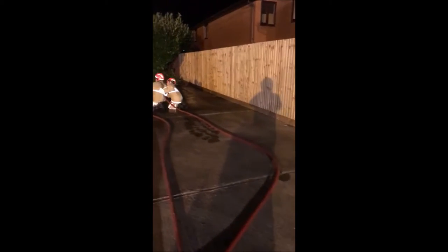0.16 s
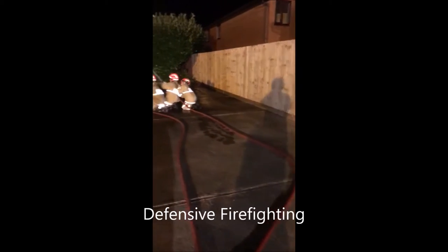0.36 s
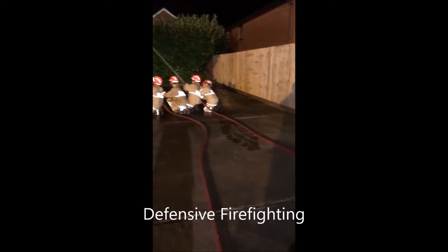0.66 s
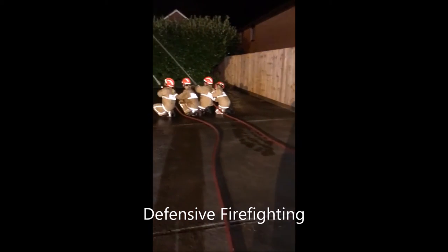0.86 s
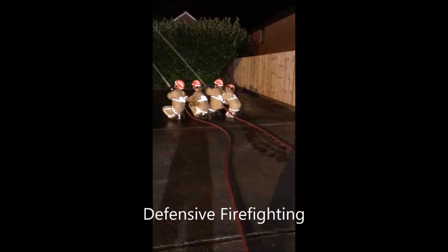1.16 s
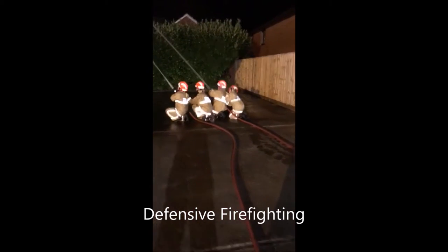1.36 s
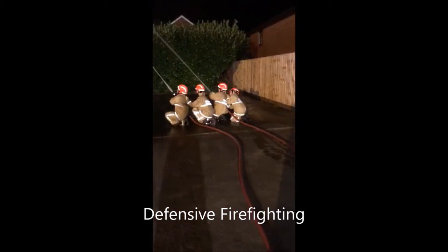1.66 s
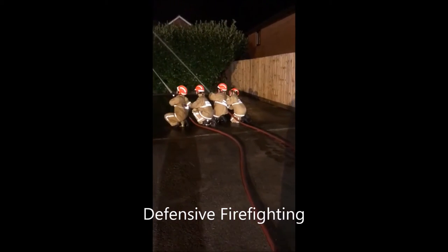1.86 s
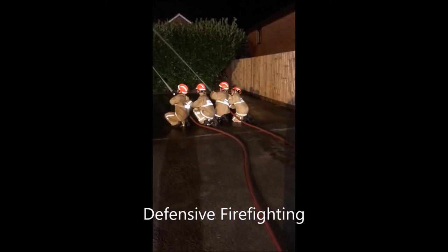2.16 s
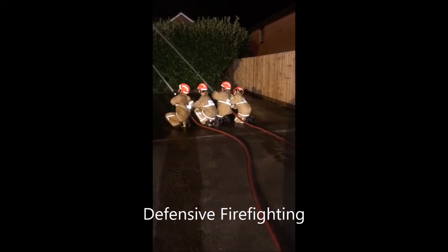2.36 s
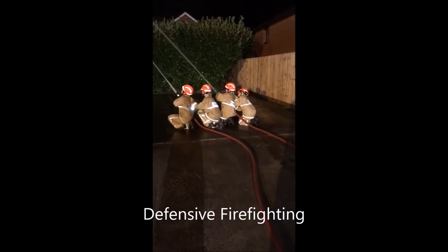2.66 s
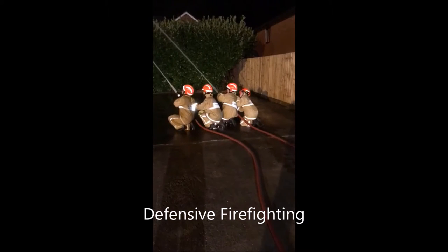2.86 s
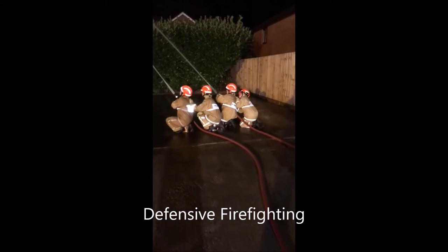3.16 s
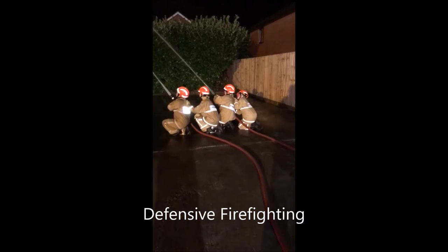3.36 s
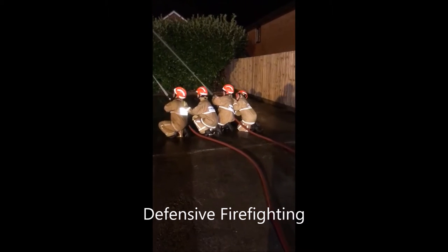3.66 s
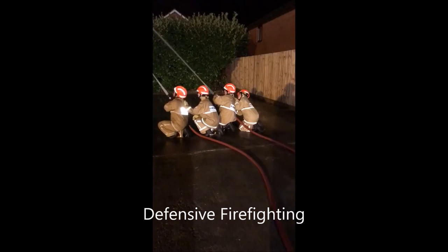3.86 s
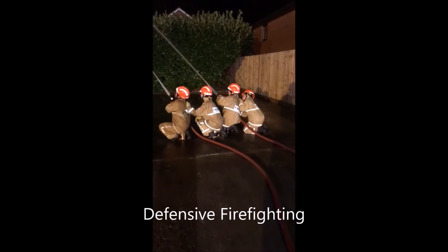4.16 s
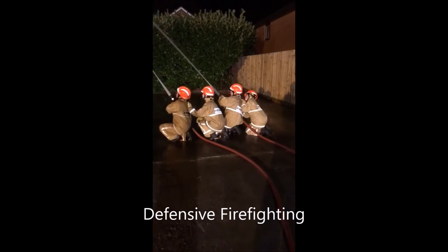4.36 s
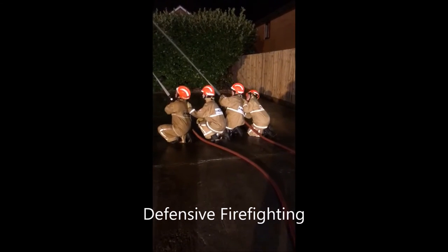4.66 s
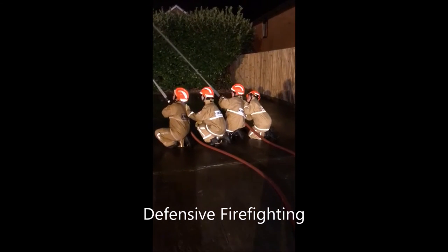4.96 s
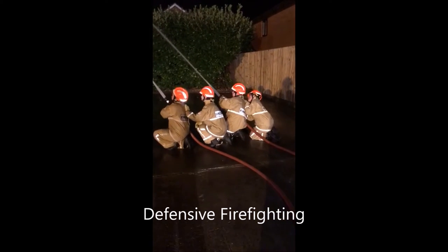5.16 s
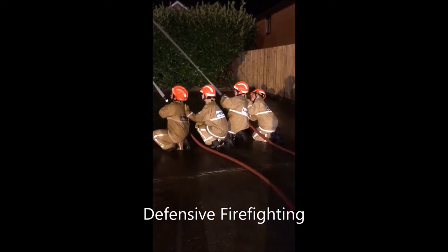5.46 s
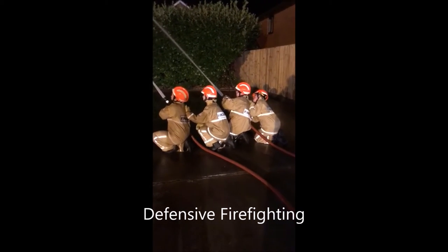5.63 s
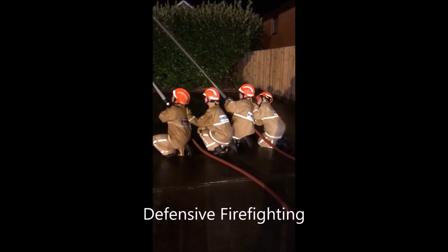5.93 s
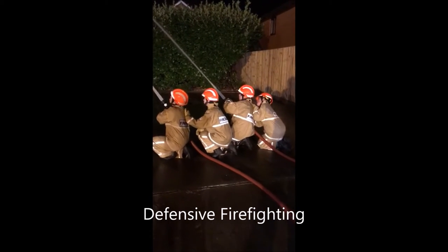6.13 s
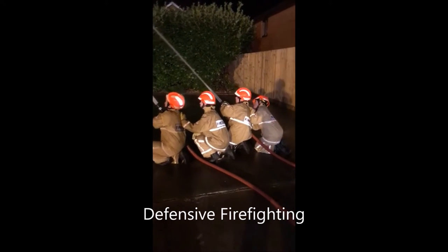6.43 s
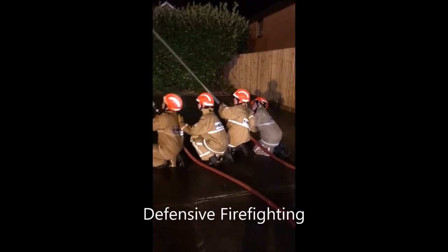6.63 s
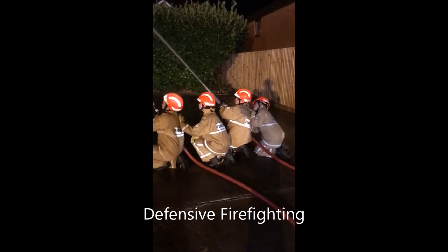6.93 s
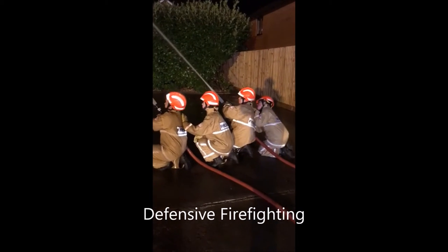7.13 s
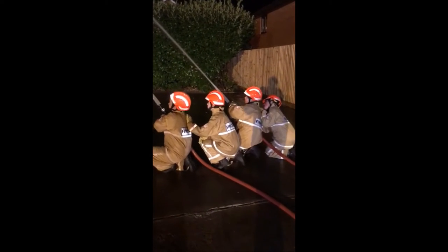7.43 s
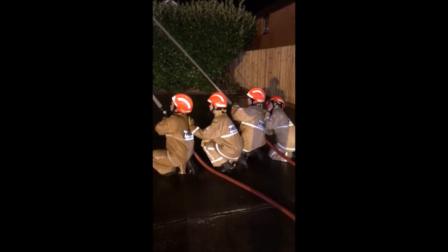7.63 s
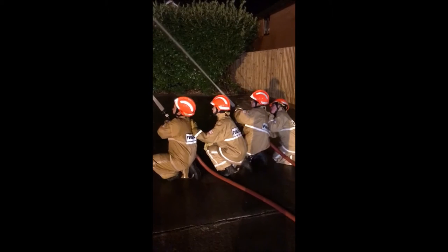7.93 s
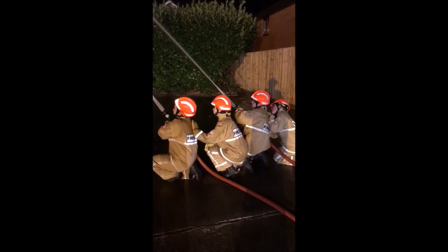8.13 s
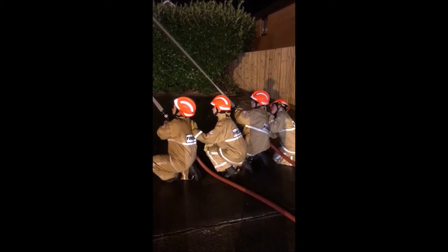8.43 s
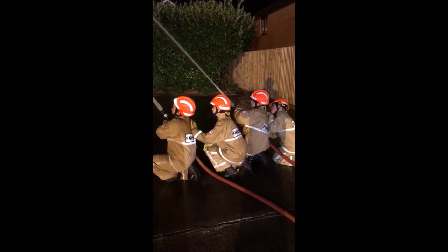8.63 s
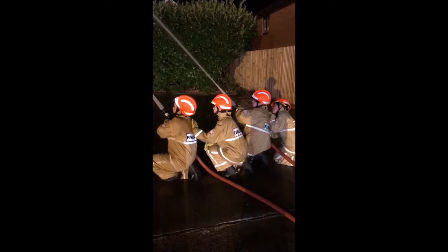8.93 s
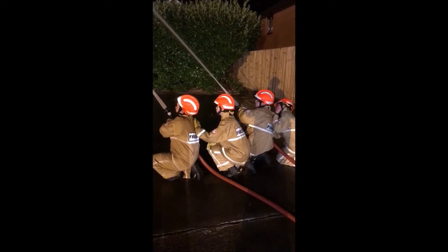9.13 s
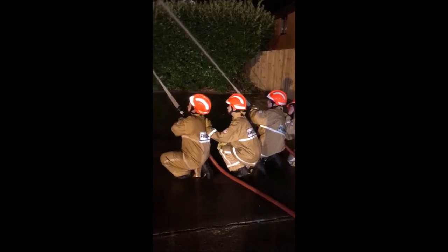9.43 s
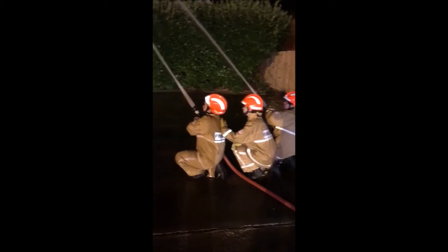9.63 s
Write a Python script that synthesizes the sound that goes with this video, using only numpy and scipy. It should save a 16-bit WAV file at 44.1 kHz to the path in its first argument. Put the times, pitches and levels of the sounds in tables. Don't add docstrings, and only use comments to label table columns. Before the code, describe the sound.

A steady high rush of pressurised water dominates from start to end, with duller falling spray behind it and a low drone of idling pump engines whose close tones slowly throb. A walking listener adds faint bumps and low rumble. Around four to five seconds the jets become a little louder, then settle, with brief spits until about seven. Nearly mono, open yard, limited handheld microphone with thin bass, cut-off top and grainy compressed treble.

```python
import sys
import numpy as np
from scipy import signal
from scipy.io import wavfile
from scipy.ndimage import uniform_filter1d

SR = 44100
rng = np.random.default_rng(int(sys.argv[2]) if len(sys.argv) > 2 else 0)


def unload_audio(sound):
    columns = np.transpose(np.atleast_2d(sound))
    steps = np.round(np.clip(columns, -1, 1) * 32767)
    wavfile.write(sys.argv[1], SR, steps.astype(np.int16))


def voltage_ratio(level):
    return 10 ** (np.asarray(level, float) / 20)


N = 431738

# (frequency [Hz], density [dB per Hz])
HISS_SPECTRUM = [(900, -30), (1550, -3), (2200, -4.5), (2650, -2), (3800, -3.5), (4550, -2.5), (4900, -6.5),
                 (5400, -5), (6900, -4.5), (7700, -8.5), (8700, -5), (10300, -9.5), (10480, -22.5),
                 (10780, -22), (11200, -37.5)]
# (frequency [Hz], density [dB per Hz])
SPRAY_SPECTRUM = [(260, -42), (450, -6), (830, -4), (1050, 1.5), (1380, 2.5), (1480, 1), (1600, -5.5),
                  (2300, -8.5), (3000, -21)]
# (frequency [Hz], density [dB per Hz])
WASH_SPECTRUM = [(12, -36), (20, -5), (43, -2), (65, -3.5), (114, -7.5), (173, -6.5), (219, -10),
                 (422, -18), (552, -22), (700, -20.5), (910, -45.5), (1540, -120)]
# (time [s], lift of the hiss [dB])
SURGES = [
    (4.42, 1.3),
    (5.38, 0.61),
    (7.37, 1.9),
]
# (time [s], peak level [dB], centre frequency [Hz], length [s])
AIR_POCKETS = [
    (4.767, -29, 2900, 0.047),
    (5.191, -32, 2550, 0.035),
    (5.849, -29.5, 3470, .05),
    (5.854, -19, 3500, .002),
    (5.869, -18, 4000, 0.0031),
    (6.875, -16, 4000, .0015),
]
# (time [s], near firing tone [dB], far firing tone [dB],
# far second tone [dB], shared tone [dB])
WALK = [(0, -39, -34.5, -52, -55), (.5, -47, -32, -46, -53), (1.5, -53, -36.5, -39.5, -44.5),
        (2.5, -63, -38.5, -43.5, -42.5), (3.25, -47, -45.5, -53, -51.5), (3.75, -45, -36, -41, -51.5),
        (4.2, -52, -34.5, -52.5, -46), (5.4, -44, -39.5, -51, -55.5), (6.4, -41.5, -37.5, -43, -43),
        (7.5, -38, -41, -48.5, -43.5), (8.6, -38, -43, -54, -42.5), (9.79, -39.5, -41.5, -49.5, -44)]
# (multiple of the engine cycle [-], level [dB])
NEAR_ORDERS = [(6, -43.6), (7, -58), (12, -45.0), (15, -47.9), (18, -51.3), (20, -54), (21, -51.3),
               (22, -45.6), (23, -51.5), (24, -51.5), (25, -58.6), (30, -54.4), (32, -59.2), (33, -60.6),
               (36, -57.3), (39, -59.6), (40, -60.8), (46, -60.8), (48, -64.5), (50, -65.4), (9, -58),
               (10, -57), (16, -60), (17, -58), (19, -61), (42, -62), (72, -62), (142, -61), (180, -59),
               (190, -63)]
# (multiple [-], start [s], end [s], change [dB])
PASSING = [
    (12, 1.5, 2.6, -3.5),
    (15, 5, 7, 7.5),
    (18, 4.5, 9, -12),
    (21, 5, 8.5, -11.5),
    (23, 1.2, 2.2, -3),
    (24, .5, 1.8, 7.5),
    (46, 1.5, 2.5, -7.5),
    (72, 6.4, 4.8, 6),
]
PASSING_LEVEL = {12: -44, 15: -52.5, 18: -50, 21: -47.5, 23: -49.5, 24: -60.5, 46: -54, 72: -65.5}
# (multiple of the engine cycle [-], level [dB])
FAR_ORDERS = [(6, -38), (8, -59.5), (12, -46), (20, -56), (21, -57), (24, -62.5), (30, -62), (36, -62.5)]
# (multiple of the rotation [-], level [dB])
PUMP_ORDERS = [(6, -46.5), (8, -50), (9, -58), (10, -48)]
# (multiple of the rotation [-], level [dB])
SLOW_PUMP_ORDERS = [(6, -49.5), (9, -43)]
# (time [s], lift of the wash [dB])
STEPS = [
    (.03, 5),
    (.72, 0.5),
    (1.35, 4),
    (3.95, 2.5),
    (4.70, 4),
    (5.12, -1),
    (5.33, 8),
    (7.23, 5),
    (8.01, 10),
]
STARVED = [.241, .540, .646, .841, .862, 1.350, 1.563, 2.268, 2.352, 2.588, 3.248, 3.291, 3.419, 3.547,
           3.654, 4.230, 4.316, 4.400, 4.529, 5.148, 5.702, 7.217, 7.600, 7.835, 8.390, 8.882, 9.628]
# (time [s], lower edge [Hz])
FILLED = [(1.081, 4130), (1.245, 6800), (1.499, 6800), (1.66, 4570), (1.918, 4570), (2.127, 6800),
          (2.451, 8200), (2.755, 5090), (2.962, 6800), (3.358, 6180), (3.728, 8200), (4.01, 5090),
          (4.59, 4570), (4.938, 5090), (4.938, 8200), (5.284, 4570), (5.493, 5600), (5.751, 6800),
          (5.96, 4570), (6.42, 4130), (6.584, 5600), (6.862, 5600), (7.305, 5600), (7.375, 5600),
          (7.701, 4130), (7.889, 4130), (8.162, 4130), (8.581, 8200), (8.975, 7500), (9.072, 4570)]

FAR_BEAT_S, SECOND_BEAT_S, NEAR_BEAT_S, UPPER_BEAT_S = .45, 1.04, 8.65, 7.69


def evened(x):
    return x / np.sqrt(np.mean(x ** 2) + 1e-20)


def ramp(t, start, length):
    return np.clip((t - start) / length, 0, 1)


def during(t, span, ramp_s):
    return ramp(t, span[0] - ramp_s, ramp_s) - ramp(t, span[1], ramp_s)


def lifts(t, events, half_width_s):
    return sum(db * (1 - ramp(abs(t - s), 0, half_width_s)) for s, db in events)


def wander(t, top_hz):
    rates = top_hz * np.geomspace(.04, 1, num=16)
    return evened(sum(np.sin(2 * np.pi * (f * t + rng.random())) / np.sqrt(f) for f in rates))


def turbulence(colour, patchy_db, flicker_db, size):
    frames, hz = 4 * N // size + 5, np.fft.rfftfreq(size, 1 / SR)
    real, imaginary, patches = rng.standard_normal((frames, len(hz), 3)).T
    patches = uniform_filter1d(patches, size=9, axis=0)
    patches = evened(uniform_filter1d(patches, size=11, axis=1))
    flicker = evened(uniform_filter1d(rng.standard_normal(frames), size=7))
    f, db = np.transpose(colour)
    field = np.interp(np.log(hz + 1), np.log(f + 1), db, left=-90, right=-90)[:, None]
    z = (real + 1j * imaginary) * voltage_ratio(field + patchy_db * patches + flicker_db * flicker)
    return evened(signal.istft(z, nperseg=size, noverlap=3 * size // 4)[1][:N])


def jet_hiss(t):
    turn_s, settle_s = 4.22, 1
    level_db = -34 + 2.5 * ramp(t, turn_s, 0.8) - 1.05 * ramp(t, turn_s + settle_s, settle_s)
    level_db = level_db + lifts(t, SURGES, half_width_s=.16)
    swell_db = 0.37 * np.repeat(wander(t[::64], top_hz=3), repeats=64)[:N]
    return voltage_ratio(level_db + swell_db) * turbulence(HISS_SPECTRUM, patchy_db=0.97, flicker_db=0.15, size=512)


def spray():
    return voltage_ratio(-39) * turbulence(SPRAY_SPECTRUM, patchy_db=0.77, flicker_db=0.0, size=512)


def spits():
    out = np.zeros(N)
    for s, db, hz, length_s in AIR_POCKETS:
        length = round(length_s * SR)
        b, a = signal.butter(2, [.75 * hz, 1.4 * hz], "bandpass", fs=SR)
        noise = evened(signal.lfilter(b, a, rng.standard_normal(4000)))
        burst = voltage_ratio(db - 5) * noise[-length:] * np.hanning(length)
        out[round(s * SR):][:len(burst)] += burst
    return out


def rotation(t, cycle_hz, orders, walked, crests):
    turns = np.cumsum(cycle_hz * (1 + .0004 * wander(t, top_hz=2.5))) * t[1]
    out = np.zeros(len(t))
    for k, db in orders:
        k = round(k)
        drift_db = 1.8 * wander(t, top_hz=.7)
        crest_s = crests.get(k, 9 * rng.random())
        since = turns - np.interp(crest_s, t, turns)
        out += np.sqrt(2) * voltage_ratio(walked.get(k, db + drift_db)) * np.cos(2 * np.pi * k * since)
    return out


def engines(t):
    s, *levels = np.transpose(WALK)
    firing_db, far_db, far_second_db, shared_db = [np.interp(t, s, db) for db in levels]
    near_db = {6: firing_db, 22: shared_db}
    for k, start, end, db in PASSING:
        near_db[round(k)] = PASSING_LEVEL[round(k)] + db * ramp(t, start, end - start)
    near = rotation(t, 7.5085, NEAR_ORDERS, near_db, {6: NEAR_BEAT_S, 12: SECOND_BEAT_S, 15: UPPER_BEAT_S})
    far = rotation(t, 9.1735, FAR_ORDERS, {6: far_db, 12: far_second_db}, {6: FAR_BEAT_S, 12: UPPER_BEAT_S})
    return near + far


def pumps(t):
    fast_db = dict(PUMP_ORDERS)
    fast_db[6] = fast_db[6] + 4 * during(t, (3.8, 6.6), 1)
    hidden_db = -6.5 * during(t, (3.1, 6.4), 1.5)
    slow_db = {k: db + hidden_db for k, db in SLOW_PUMP_ORDERS}
    fast = rotation(t, 8.962, PUMP_ORDERS, fast_db, {6: FAR_BEAT_S, 10: SECOND_BEAT_S})
    return fast + rotation(t, 7.2947, SLOW_PUMP_ORDERS, slow_db, {6: NEAR_BEAT_S})


def yard_wash(t):
    shake_db = during(t, (3.7, 6.3), .85) + lifts(t, STEPS, half_width_s=.05)
    return voltage_ratio(-38 - 1.5 + shake_db) * turbulence(WASH_SPECTRUM, patchy_db=1.95, flicker_db=0.1, size=4096)


def scene():
    t = np.arange(N) / SR
    slow_t = np.arange(0, N + 8, 8) / SR
    water = jet_hiss(t) + spray() + spits()
    tones = signal.resample_poly(engines(slow_t) + pumps(slow_t), 8, 1)[:N]
    return np.tile(water + tones + yard_wash(t), (2, 1))


def lapped(x, size, start, window, change):
    n, k = np.arange(2 * size), np.arange(round(22600 * size / SR))
    phase = np.pi / size * np.outer(k + .5, n + .5 + size / 2)
    basis = np.sqrt(2 / size) * window * np.cos(phase)
    blocks = np.pad(x, (2 * size - start, 3 * size))[:(N // size + 4) * size].reshape(-1, size)
    lines = np.hstack([blocks[:-1], blocks[1:]]) @ basis.T
    hz = (k + .5) * SR / (2 * size)
    frames = change(lines, hz, lambda s: round((s * SR - start) / size) + 1) @ basis
    joined = frames[..., :-1, size:] + frames[..., 1:, :size]
    return joined.reshape(*joined.shape[:-2], -1)[..., size - start:][..., :N]


def starve(lines, hz, frame_of):
    power = uniform_filter1d(lines ** 2, size=31)
    local = np.sqrt(uniform_filter1d(power, size=5, axis=0) + 1e-20)
    step = local * np.clip(hz / 1500, .1, 1)
    for s in STARVED:
        at = frame_of(s)
        survive = 2.1 if s == 7.217 else 2.4
        wide = survive / .6 * np.clip(hz / 7000, .2, 1) ** .07 * local[at]
        step[at, hz > 330] = wide[hz > 330]
    top = voltage_ratio(-4.5) * local[:, (hz > 9000) & (hz < 10000)].mean(1, keepdims=True)
    step = np.maximum(step, top * (hz > 10150))
    return np.sign(lines) * np.floor(abs(lines) / step + .4) * step


def fill(lines, hz, frame_of):
    kept = (abs(lines) > voltage_ratio(-63)) | (hz < 9600)
    out = np.tile(lines * kept, (2, 1, 1))
    for s, lo_hz in FILLED:
        at, hi_hz = frame_of(s), min(1.27 * lo_hz, 10400)
        band = (hz > lo_hz + 40) & (hz < hi_hz - 40)
        noise = rng.standard_normal((2, len(hz)))[:, band]
        out[:, at, band] = voltage_ratio(-0.8) * lines[at, band].std() * noise
    return out


def roll_off(x):
    return signal.sosfilt(signal.butter(12, 11280, fs=SR, output="sos"), x)


def record(dry):
    bass_cut = signal.butter(3, 38, "highpass", fs=SR, output="sos")
    sound = signal.sosfilt(bass_cut, dry[0])
    size = 941
    sine = np.sin(np.pi * (np.arange(2 * size) + .5) / (2 * size))
    thinned = lapped(sound, size, 233, sine, starve)
    size = 1024
    kaiser = signal.windows.kaiser_bessel_derived(2 * size, 4 * np.pi)
    mix = lapped(thinned, size, 617, kaiser, fill)
    return roll_off(mix)


dry = scene()
out = record(dry)
unload_audio(out)
```